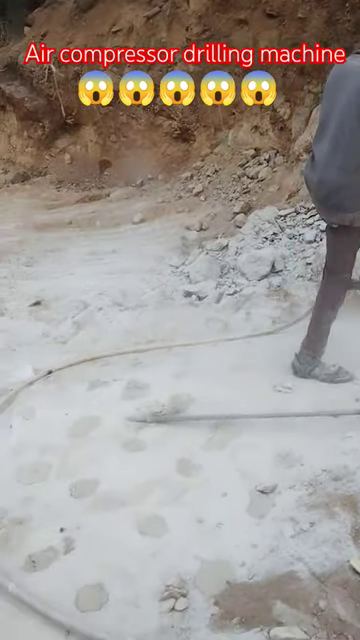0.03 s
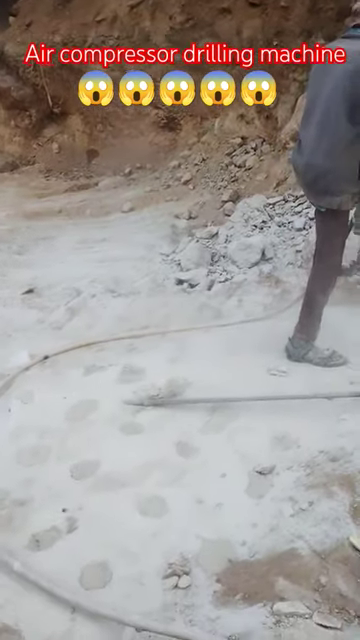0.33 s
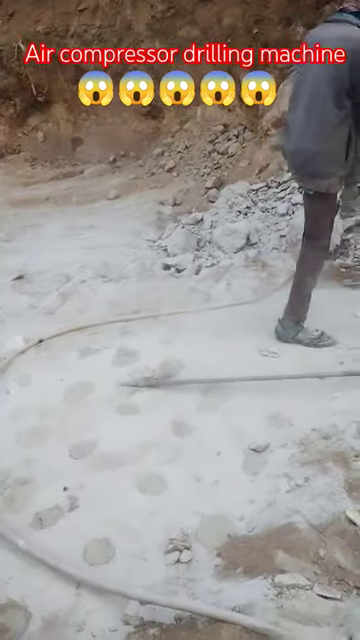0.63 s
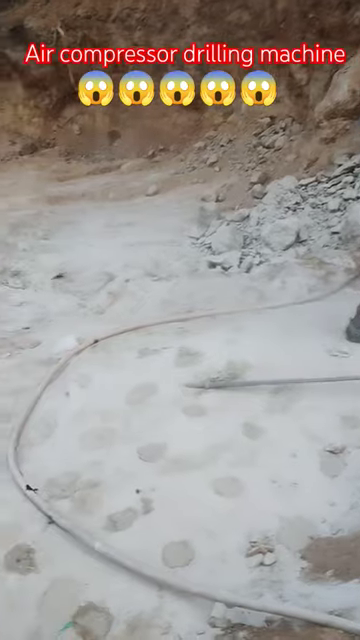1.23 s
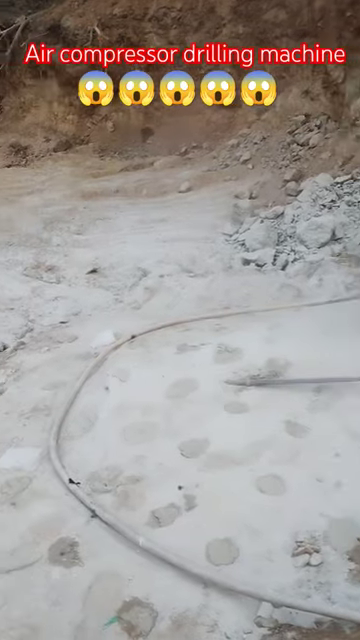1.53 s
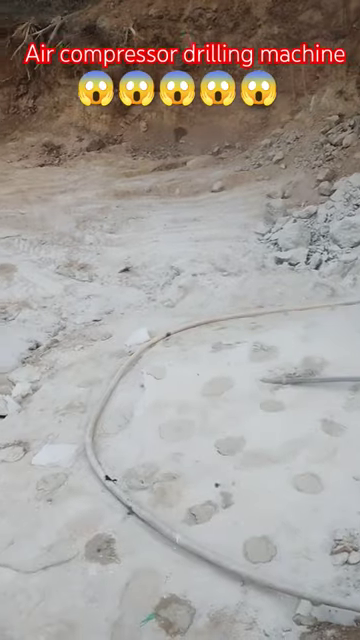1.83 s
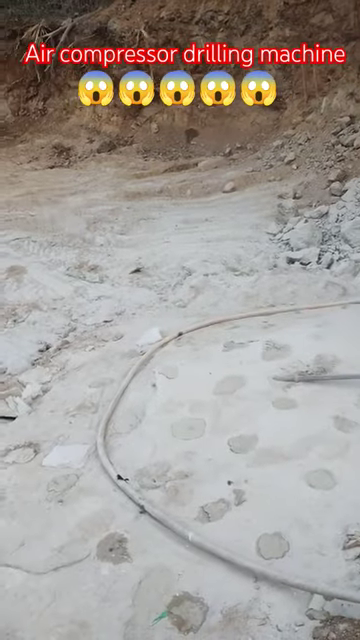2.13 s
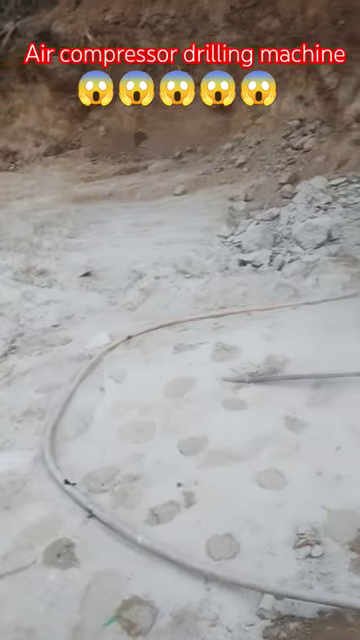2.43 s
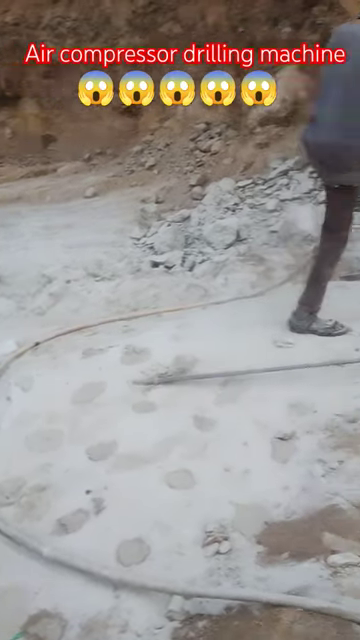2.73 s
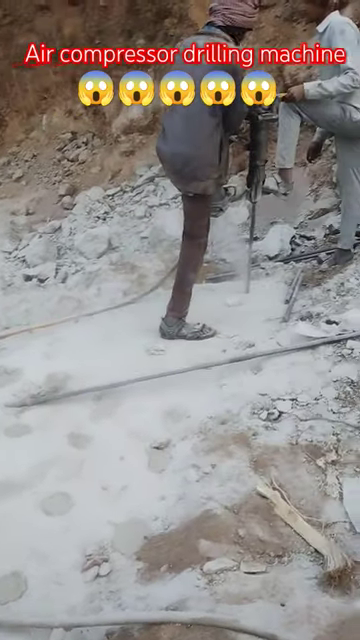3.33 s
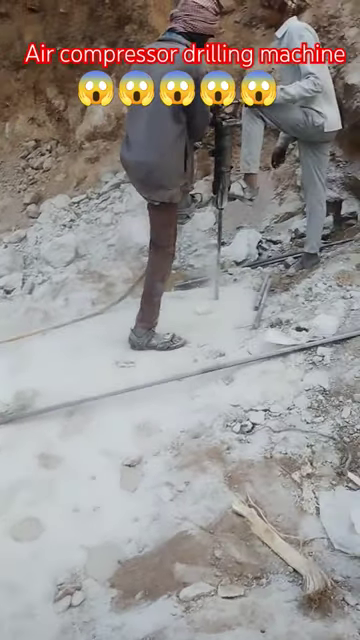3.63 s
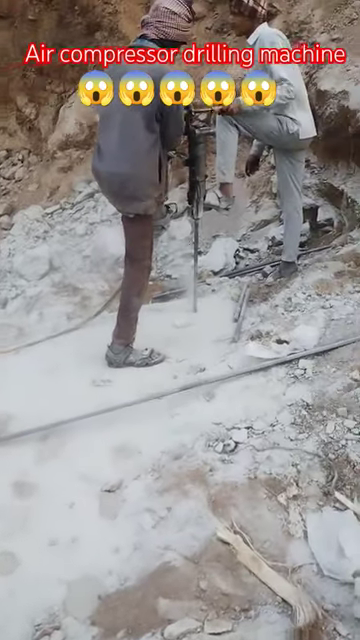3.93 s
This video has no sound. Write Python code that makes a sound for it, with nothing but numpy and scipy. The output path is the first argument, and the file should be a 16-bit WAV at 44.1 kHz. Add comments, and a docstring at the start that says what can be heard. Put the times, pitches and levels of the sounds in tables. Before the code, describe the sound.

An air-powered drill pounds rock rapidly, its steel rod ringing over a faint engine drone.

```python
"""A hand-held pneumatic rock drill hammers about 26 times a second in a quarry, a few metres from a phone.
Every stroke puffs exhaust air and strikes the long drill steel, which rattles in its hole and rings
in shrill bending modes. The rings shift in balance and direction as the phone turns.
Air hisses, rock chips crackle, the rock face echoes the puffs, and a compressor engine drones behind."""
import sys
import numpy as np
from scipy import signal
from scipy.fft import rfft, irfft
from scipy.io import wavfile
from scipy.ndimage import uniform_filter1d, minimum_filter1d

SR = 44100
rng = np.random.default_rng(int(sys.argv[2]) if len(sys.argv) > 2 else 0)


def to_wav(s):
    """Save 16-bit WAV."""
    ch = np.atleast_2d(s).T  # columns
    pcm = np.round(np.clip(ch, -1, 1) * 32767)  # PCM
    wavfile.write(sys.argv[1], SR, pcm.astype(np.int16))


N = 176400
STRIKE_LAG_S = .0052  # the piston lands this long after the exhaust opens

# Shared swell of the air, chips, hammer and weak steel modes. Each row: time in seconds, gain in dB.
DRILL_SWELL = [(0, 2), (.7, -0.5), (1.3, -1.5), (1.9, -2), (2.5, -.5), (3.1, 0), (3.7, 2.5), (4, 0)]


def undb(db):
    """Decibels to gain."""
    return 10 ** (np.asarray(db) / 20)


def level(x, db):
    """Scale to an rms level."""
    return x * undb(db) / np.sqrt(np.mean(x ** 2))


def curve(rows):
    """Join (seconds, value) rows by straight lines."""
    return np.interp(np.arange(N) / SR, *np.array(rows).T)


def band(x, hz, width_hz):
    """One resonance."""
    return signal.lfilter(*signal.iirpeak(hz, hz / width_hz, fs=SR), x)


def lowpass(x, hz, order=1):
    """Soften everything above hz."""
    return signal.sosfilt(signal.butter(order, hz, fs=SR, output="sos"), x)


def drift(rate_hz):
    """Smooth random wander with a spread of 1."""
    span = int(SR / rate_hz)
    steps = np.repeat(rng.standard_normal(N // span + 1), span)
    wander = uniform_filter1d(uniform_filter1d(steps, span), span)[:N]
    return wander / wander.std()


def wide_noise(spectrum, mono_below_hz):
    """Stereo noise coloured by (Hz, dB) rows, centred in the bass and wide above."""
    hz, db = np.array(spectrum).T
    bins_hz = np.maximum(np.arange(N // 2 + 1) * SR / N, 1)
    colour = undb(np.interp(np.log(bins_hz), np.log(hz), db))
    mid, side = irfft(rfft(rng.standard_normal((2, N))) * colour, N)
    return mid + (side - lowpass(side, mono_below_hz)) * np.array([[1], [-1]])


def strokes(lag_s):
    """Number of the running stroke and seconds since it began, lag_s after the exhaust opens."""
    # The piston's tempo. Each row: time in seconds, strokes per second.
    stroke_rate = [(0, 25.95), (0.35, 25.69), (0.6, 26.68), (1.1, 26.31), (1.8, 26.32), (2.1, 25.87),
                   (2.8, 26.19), (3.3, 25.07), (3.55, 26.33), (4, 26.23)]
    first_puff_s = .0132
    rate = curve(stroke_rate)
    cycles = np.cumsum(rate) / SR - (first_puff_s + lag_s) * rate + 2
    return cycles.astype(int), cycles % 1 / rate


def burst(lag_s, hz, width_hz, decay_s):
    """A burst of band noise on every stroke, lag_s after the exhaust opens."""
    _, age = strokes(lag_s)
    noise = rng.standard_normal((2, N)) * np.exp(-age / decay_s)
    return band(band(noise, hz, width_hz), hz, width_hz)


def drill_steel():
    """Blows rattle the rod and feed its modes unevenly; they arrive direct and scattered by the rock."""
    # Modes of the steel: mostly bending modes, with weaker longitudinal modes at 3100, 5500, 6750 and 10280 Hz.
    # Each row: pitch in Hz, relative level in dB, left minus right in dB, left phase lead in radians, direct
    # share from 0 to 1, group whose swell it follows.
    modes = [(2600, -49.5, 1, 1.4, .15, "air"), (2720, -51, 1, 1.4, .15, "air"),
             (3100, -51, 1, -3, .3, "air"), (3550, -44.7, 3, .2, .4, "air"),
             (4070, -39.1, .6, 1.5, .8, "low"), (4500, -45, 1, 1.8, .6, "low"),
             (4605, -37.1, 1.4, 2, .72, "low"), (5200, -39.3, .9, 2.9, .65, "low"),
             (5500, -52, 1, 3, .3, "air"), (5780, -36.2, 2.9, 2.9, .78, "low"),
             (6410, -31, -.9, -2.3, .88, "mid"), (6750, -46, 1, -2.2, .4, "air"),
             (7070, -31, 3.6, -2.1, .82, "mid"), (7730, -32.5, 3.8, -.5, .72, "mid"),
             (8430, -30.6, -1.6, -2.45, .82, "high"), (9140, -33.8, -3, -.4, .78, "high"),
             (9860, -44.3, -1.3, 1.7, .25, "flare"), (10280, -53, -2, 1, .2, "air"),
             (10600, -39.5, -2.8, .7, .62, "high"), (11380, -39.5, -3.9, 1.6, .65, "top"),
             (12170, -47.3, -2.9, 2.2, .2, "top"), (12930, -45, -3.8, 2.3, .35, "top"),
             (13790, -45, -3.4, 3, .35, "top")]
    # Swells of four groups of rings as the phone turns. Each row: time in seconds, gain in dB.
    low_swell = [(0, 2), (.25, -2.5), (.5, -3), (1.1, -5), (1.6, -4), (2.2, -2), (2.8, -1.5), (3.15, 2.5),
                 (3.45, 5.5), (4, 6.5)]
    mid_swell = [(0, -1), (.35, 4), (.8, 1.2), (1.0, 4), (1.2, 4), (1.6, 0.5), (2.1, -1.5), (2.7, 3.5),
                 (3.2, 0.5), (3.7, -3.5), (4, -5)]
    high_swell = [(0, 1.5), (.6, 3), (1.2, -0.5), (1.7, 4), (2.4, 4), (2.8, 0.5), (3.4, 1.5), (3.7, 0.5),
                  (4, -5.5)]
    top_swell = [(0, 2.5), (.5, 1.5), (1.3, 0), (2.2, -1.5), (3.4, 1.5), (4, -3)]
    # One high ring flares at the opening. Each row: time in seconds, gain in dB.
    flare = [(0, 11.5), (.14, 11), (.26, 1)]
    # The phone turns away and back. Each row: time in seconds, lag of the right port in microseconds.
    port_lag = [(0, -27), (.4, -5), (.8, -2), (1.1, 30), (1.6, 22), (2.1, 8), (2.5, 9), (3, -11),
                (3.5, -31), (4, -40)]
    ring_width_hz, skirt_hz, detune_hz, damping_hz = 40.6, 174, 14, 15000
    blow_scatter_db, ring_scatter_db, rattle_decay_s = .84, 1.78, .022
    blow, age = strokes(STRIKE_LAG_S)
    blow_gain = undb(blow_scatter_db * rng.standard_normal(blow[-1] + 1))[blow]
    rattle = (1 + np.exp(-age / rattle_decay_s)) * blow_gain
    swells = dict(air=DRILL_SWELL, low=low_swell, mid=mid_swell,
                  high=high_swell, top=top_swell, flare=flare)
    bite = {group: undb(drift(13)) for group in swells}  # the turning bit bites harder and softer
    lag_s = curve(port_lag) * 1e-6
    out = np.zeros((2, N))
    for hz, db, pan_db, lead, direct, group in modes:
        force, detune = rng.standard_normal((blow[-1] + 1, 2))[blow].T
        drive = rng.standard_normal((3, 2, N), dtype=np.float32) * rattle * undb(ring_scatter_db * force)
        width_hz = ring_width_hz * (1 + (hz / damping_hz) ** 4)  # the top modes die sooner
        swing = lowpass(lowpass(drive, width_hz / 2), skirt_hz, order=2)
        swing = swing[:, 0] + 1j * swing[:, 1]  # complex envelopes: direct, scattered left and right
        bearing = np.exp(.5j * (lead + 2 * np.pi * hz * lag_s))
        swell = undb(curve(swells[group]))
        share = direct / (direct + (1 - direct) / swell ** .9)  # a quieter ring is also more diffuse
        ports = np.sqrt(share) * swing[0] * np.array([bearing, bearing.conj()])
        ports += np.sqrt(1 - share) * swing[1:]
        ports /= (np.abs(ports) + np.std(ports) / 2) ** .19  # the hole damps the widest swings
        carrier = np.exp(2j * np.pi * np.cumsum(hz + detune_hz * detune) / SR)
        ring = (ports * carrier).real * undb(np.array([[pan_db], [-pan_db]]) / 2)
        out += level(ring, db + 1.11) * swell * bite[group]
    return out


def hammer():
    """On every stroke gas gushes from the port, then the piston cracks on the shank."""
    gush = level(burst(0, hz=1400, width_hz=990, decay_s=.028), -51)
    crack = level(burst(STRIKE_LAG_S, hz=3940, width_hz=2400, decay_s=.0018), -48)
    return (gush + crack) * undb(curve(DRILL_SWELL))


def exhaust():
    """One puff a stroke: a low thump and a rough bark, slapped back by the rock face."""
    # Resonances of the exhaust port. Each row: centre in Hz, width in Hz, relative gain in dB.
    port_resonances = [(405, 110, -2), (590, 100, 4), (760, 52, -4), (1250, 210, -5)]
    # Swells of the thump and of the bark. Each row: time in seconds, gain in dB.
    thump_swell = [(0, 4), (.7, 1), (1.4, -1), (2.1, -0.5), (2.8, 1.5), (3.3, -6.5), (4, -2)]
    bark_swell = [(0, 2.5), (.7, 5), (1.3, -2), (2, -6.5), (2.7, 2), (3.3, 4), (3.7, 2.5), (4, 7.5)]
    scatter_db, jitter_s, bark_decay_s = 2.5, .0005, .0064
    echo_s, echo_db = .02, -8.5
    puff, age = strokes(0)
    starts = np.flatnonzero(np.diff(puff)) + 1
    size, late = rng.standard_normal((len(starts), 2)).T
    starts = np.clip(starts + (late * jitter_s * SR).astype(int), 0, N - 1)
    pulses = np.zeros(N)
    pulses[starts] = undb(scatter_db * size)
    thump = level(lowpass(band(pulses, hz=184, width_hz=73), 254, order=2), -48.5)
    gas = rng.standard_normal(N) + .48 * rng.standard_normal((2, N))  # centred, with a little width
    jet = level(pulses, 0) + 1.4 * level(gas * np.exp(-age / bark_decay_s), 0)
    bark = sum(undb(db) * band(jet, hz, width) for hz, width, db in port_resonances)
    bark = level(lowpass(bark, 2750, order=2), -53)
    near = thump * undb(curve(thump_swell)) + bark * undb(curve(bark_swell))
    return near + undb(echo_db) * np.roll(near, int(echo_s * SR), axis=1)


def air_and_chips():
    """Air rushes and rock chips crackle, both surging after every blow."""
    # Colour of the rushing air and the grinding bit. Each row: frequency in Hz, relative level in dB.
    air_spectrum = [(300, -24), (600, -8.5), (1000, -9), (1600, -7.5), (2400, -3), (3100, -6.5), (3850, -4),
                    (4400, -3), (4900, -2), (5500, -2), (7000, -3.5), (8800, -2), (10000, -11),
                    (12000, -42), (14500, -27)]
    rise_s, decay_s = .0025, .013
    base_chips_per_s, chip_spread_db = 380, 3.5
    _, age = strokes(STRIKE_LAG_S)
    surge = 1 + 1.3 * (1 - np.exp(-age / rise_s)) * np.exp(-age / decay_s)
    air = level(wide_noise(air_spectrum, mono_below_hz=895) * surge, -33)
    grains = (rng.random((2, N)) < base_chips_per_s * surge / SR) * rng.standard_normal((2, N))
    grains *= undb(chip_spread_db * np.minimum(rng.exponential(size=(2, N)), 3))
    chips = level(band(grains * surge, hz=2320, width_hz=3100), -49.5)
    return (air + chips) * undb(curve(DRILL_SWELL))


def compressor():
    """Engine harmonics line up loosely into one beat a cycle (two shaft turns), over a steady hum."""
    # The engine's drone. Each row: multiple of the cycle rate, level in dB before the swell.
    harmonics = [(5, -66), (10, -59), (12, -56.5), (13, -62), (14, -67), (15, -49.5), (16, -50),
                 (17, -55.5), (18, -64), (29, -72), (30, -65.5), (31, -71.5), (32, -70), (61, -60),
                 (62, -68.5)]
    # Swell of the drone. Each row: time in seconds, gain in dB.
    engine_swell = [(0, 2), (.9, 0), (1.5, -6), (2.3, -3.5), (4, -0.5)]
    cycle_hz, hum_hz, pitch_drift, smear_rad = 13.69, 79.3, .0015, .81
    cycle_phase = 2 * np.pi * np.cumsum(cycle_hz * (1 + pitch_drift * drift(2.08))) / SR
    drone = np.zeros(N)
    for multiple, db in harmonics:
        tone = np.sin(multiple * cycle_phase + smear_rad * rng.standard_normal())
        drone += level(tone * undb(.71 * drift(3.87)), db)
    hum_phase = 2 * np.pi * np.cumsum(hum_hz * (1 + pitch_drift * drift(3.7))) / SR
    hum = level(np.sin(hum_phase) * undb(1.1 * drift(2.7)), -54.5)
    return drone * undb(curve(engine_swell)) + hum


def pit_rumble():
    """The machines around the pit blur into a low bed of noise."""
    # Colour of the rumble. Each row: frequency in Hz, relative level in dB.
    rumble_spectrum = [(20, -31), (40, -40), (70, -6), (110, -1), (170, -1.5), (215, -1), (270, -8),
                       (400, -10.5), (700, -11.5), (1200, -21.5), (3000, -46)]
    return level(wide_noise(rumble_spectrum, mono_below_hz=473), -47)


def buffeting():
    """Moving air flutters faintly on each microphone port separately."""
    flutter = band(rng.standard_normal((2, N)), hz=65.3, width_hz=32)
    return level(lowpass(flutter, 130.6, order=2), -63)


def scene():
    """The drill in front, the compressor and the pit behind."""
    drill = drill_steel() + hammer() + exhaust() + air_and_chips()
    return drill + compressor() + pit_rumble() + buffeting()


def record(dry):
    """The phone's fast gain control evens out swells, a limiter holds the peaks, and the top is cut."""
    threshold_db, response_s, makeup_db = -20, .017, 1
    ceiling_db, hold_s, top_hz = -10, .004, 14200
    power = lowpass(np.mean(dry ** 2, axis=0), 1 / (2 * np.pi * response_s))
    evened = dry * undb(makeup_db) / (1 + (power / undb(threshold_db) ** 2) ** 2) ** (1 / 4)
    peak_gain = undb(ceiling_db) / np.maximum(np.abs(evened), undb(ceiling_db))
    hold = int(hold_s * SR)
    limited = evened * uniform_filter1d(minimum_filter1d(peak_gain, hold), hold)
    return signal.sosfilt(signal.ellip(12, .2, 80, top_hz, fs=SR, output="sos"), limited)


dry = scene()
out = record(dry)
to_wav(out)
```